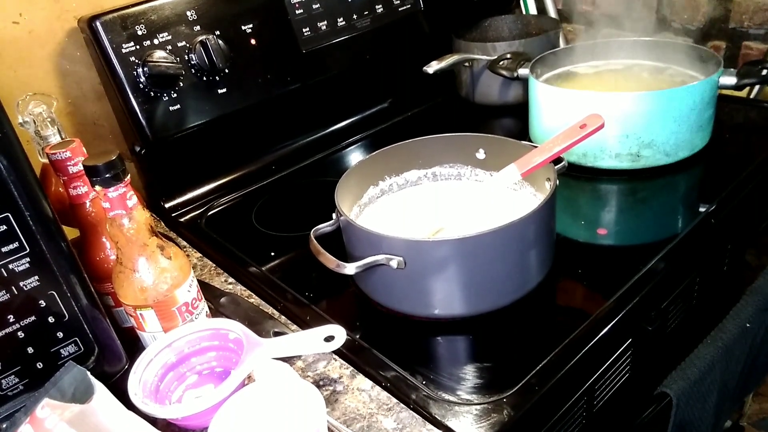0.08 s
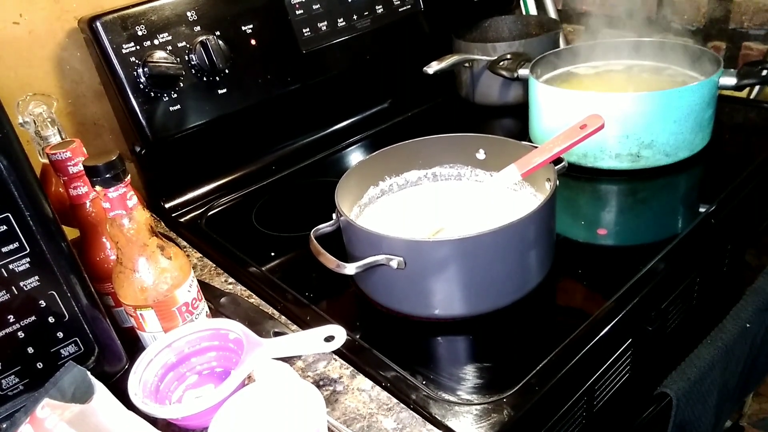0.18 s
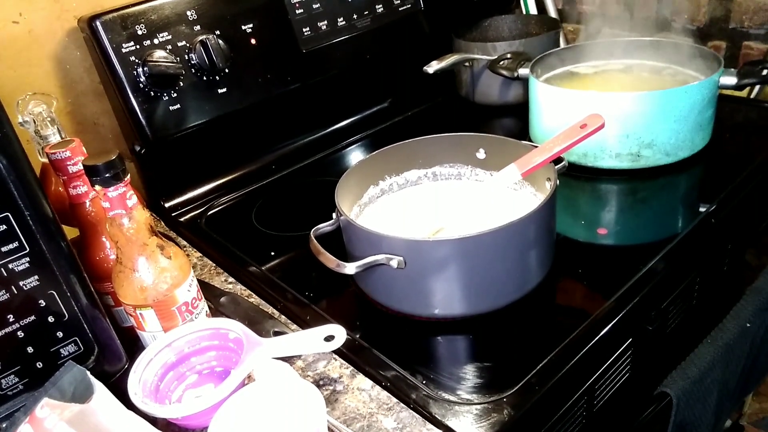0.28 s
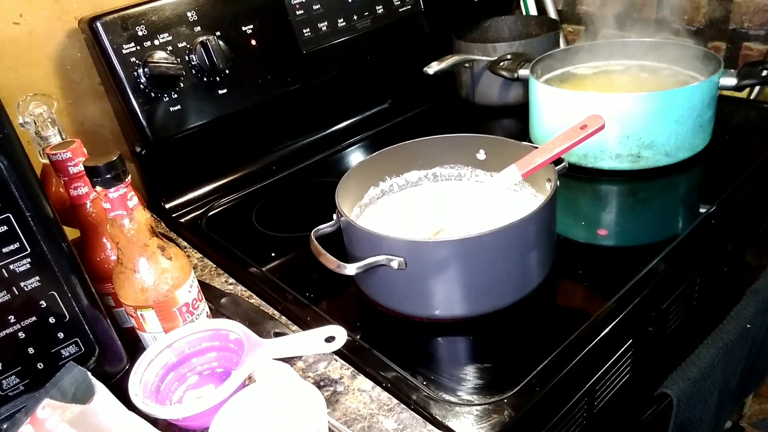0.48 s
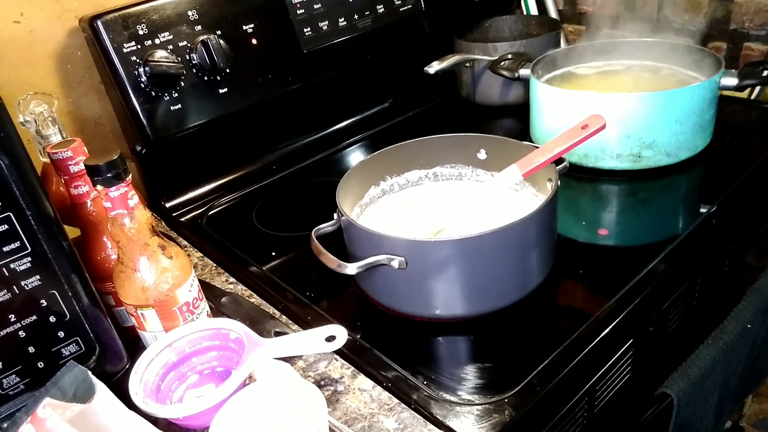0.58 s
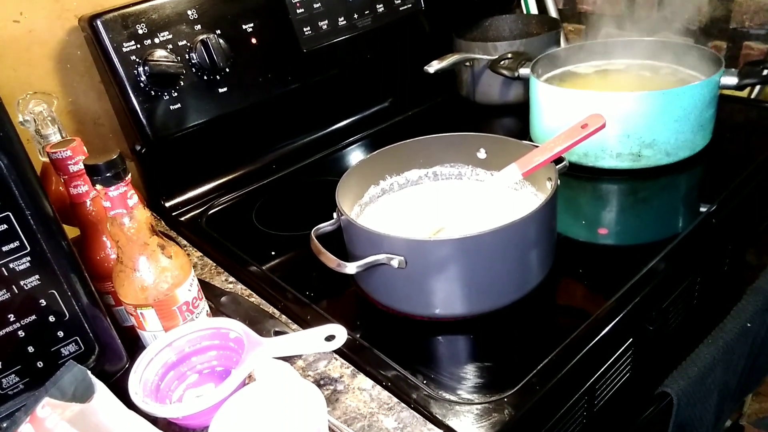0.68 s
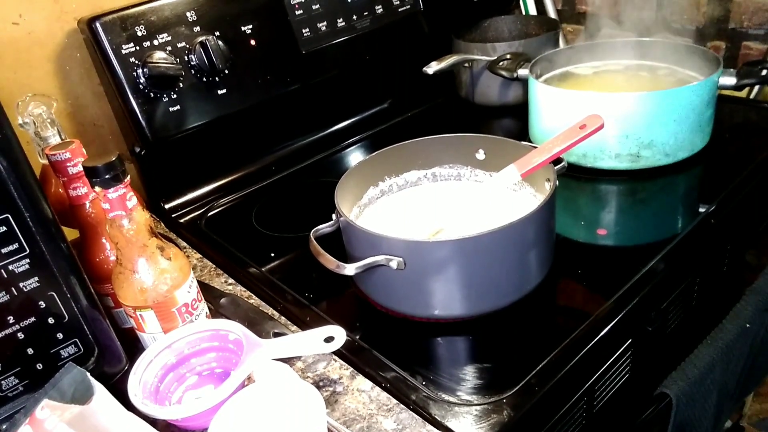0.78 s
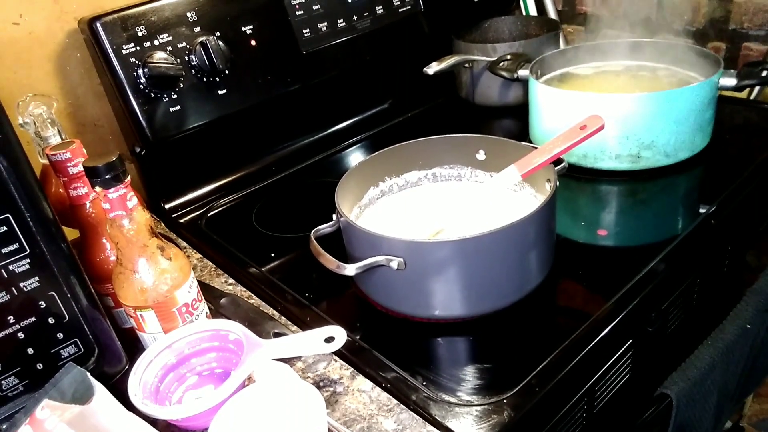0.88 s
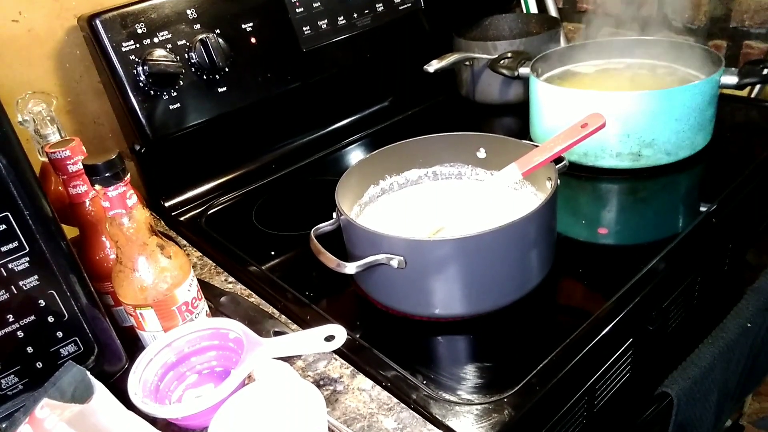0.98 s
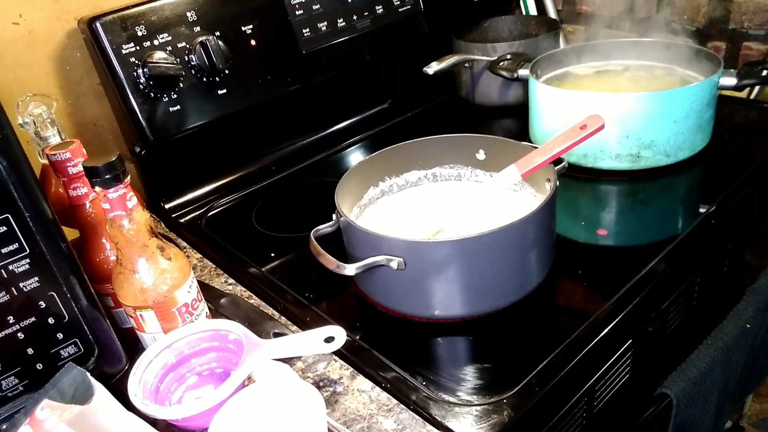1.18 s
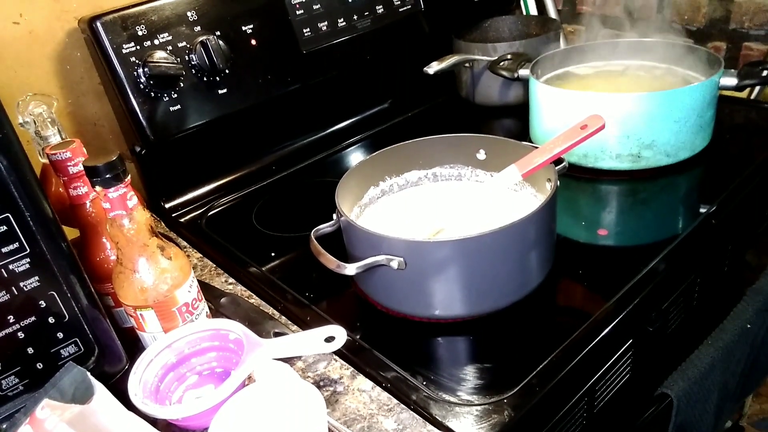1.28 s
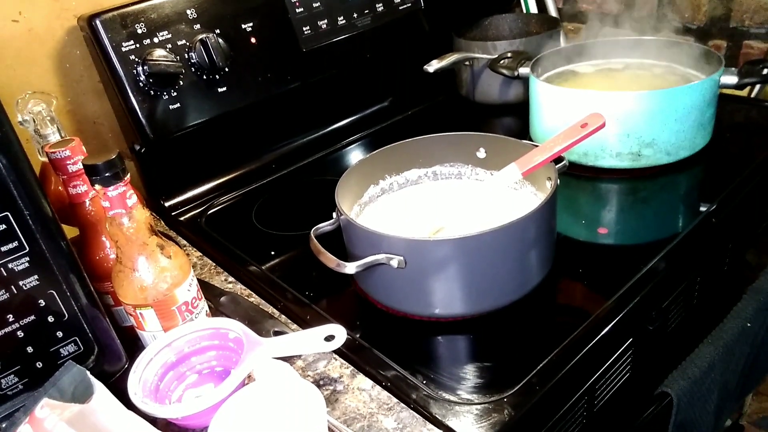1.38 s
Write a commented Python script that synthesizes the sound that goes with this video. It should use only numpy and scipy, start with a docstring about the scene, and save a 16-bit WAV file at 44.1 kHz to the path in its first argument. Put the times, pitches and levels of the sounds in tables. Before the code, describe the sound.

A utensil clatters onto a kitchen counter. After quiet room noise, a faint hollow touch at 0.2 seconds leads into a loud burst of sharp clacks and boomy thuds at 0.24-0.3. Lighter bounces follow around 0.4-0.5 and 0.61, then soft low knocks. A quick, quiet rattle runs 0.86-0.92. Tiny metal tinks come at 1.16 and 1.32, one faint thud at 1.38. Close, dry, short room reflections.

```python
"""Room noise, faint appliance hums and grainy rustles of shaped noise lie under a close, dry kitchen scene.
A utensil lands on the counter: its handle knocks hollowly, then decaying modes boom as the cabinet thuds.
Hard edge ticks, short swelling sines with a noise crack, mark the bounces; a quickening rattle follows.
Tiny metal tinks and one last faint thud come near the end; dense decaying noise answers as the kitchen."""
import sys
import numpy as np
from scipy import signal
from scipy.fft import rfft, irfft
from scipy.io import wavfile
from scipy.ndimage import uniform_filter1d

SR = 44100
rng = np.random.default_rng(int(sys.argv[2]) if len(sys.argv) > 2 else 0)


def boost(x):
    """Linear amplitude factor 10**(x/20) for a level x in decibels (scalar or array-like)."""
    u = np.asarray(x, float) / 20
    return 10 ** u


def int16_out(signal):
    """Quantize to a 16-bit WAV file."""
    q = np.round(np.clip(np.atleast_2d(signal).T, -1, 1) * 32767)
    wavfile.write(sys.argv[1], SR, q.astype(np.int16))


N = 61740

# steady appliance tones: f/Hz, level/dB, width/Hz
HUM_TONES = [(135.5, -71, 20), (1620, -84.5, 13)]
# room noise colour before levelling: f/Hz, density/dB per Hz
AIR_COLOUR = [(20, -46.5), (45, -13), (70, -11), (116, -13), (250, -13), (388, -16), (527, -9.5),
              (650, -16.5), (950, -19.5), (1300, -28), (2300, -30), (6000, -34), (9500, -29),
              (12000, -33.5), (16000, -37)]
# left-right likeness of the room noise: f/Hz, likeness (0 to 1)
AIR_LIKENESS = [(50, 0.74), (300, 0.18), (800, 0.46), (2000, 0.6), (16000, 0.049)]
# faint rustles: start t/s, length/s, level/dB before grain and colour
RUSTLE_SWELLS = [(.0, 0.059, -68.5), (0.124, 0.044, -67.5), (0.64, 0.17, -61.5), (0.782, 0.084, -74),
                 (0.817, 0.032, -64), (1.001, 0.014, -74.5), (1.154, 0.1, -70.5), (1.237, 0.028, -66.5),
                 (1.26, 0.25, -68)]
# rustle colour before levelling: f/Hz, density/dB per Hz
RUSTLE_COLOUR = [(1200, -9.5), (2500, -10), (4000, -10.5), (7000, -12), (10000, -9), (12000, -14),
                 (16000, -24.5)]
# decay of the kitchen's reflections: f/Hz, t60/s
KITCHEN_DECAY = [(100, 0.6), (500, 0.11), (2000, 0.28), (6000, 0.16), (12000, 0.26)]
# colour of the blows at the microphones, direct and reflected: f/Hz, level/dB
MIC_COLOUR = [(20, -17.5), (45, 1.5), (1200, 1.5), (2500, 4.5), (5000, 0.5), (9000, 2), (11000, -2.5),
              (13000, -11.5), (16000, -14)]
# tiny metal tinks: t/s, level/dB
TINK_HITS = [(1.161, -57), (1.166, -57), (1.172, -68.5), (1.321, -52), (1.325, -52.5), (1.331, -57.5),
             (1.336, -63.5), (1.354, -57.5)]
# modes of a tink, before random spread: f/Hz, level/dB, t60/s
TINK_MODES = [(4480, -16, 0.029), (5210, -11.5, 0.024), (6200, -12.5, 0.028), (8050, -6.5, 0.052),
              (8780, -4.5, 0.025), (9270, -4.5, 0.027), (10400, -7, 0.023), (12600, -10.5, .015)]
# modes of the hollow handle, before random spread: f/Hz, level/dB, t60/s
HANDLE_MODES = [(224, -3.5, 0.099), (398, -10, 0.16), (559, 2, 0.17), (792, -2, 0.87), (1048, -12, 0.19),
                (1010, -12, 0.068)]
# blows into the counter: t/s, level/dB, lowest f/Hz stirred, contact roll-off f/Hz, multiple of usual ringing time
THUD_BLOWS = [(0.2021, -36, 435, 1080, 1.7), (0.2371, -16.5, 212, 1620, 1.59),
              (0.2442, -14, 170, 970, 0.93), (0.248, -21, 29.7, 198, 1.24), (.255, -16, 150, 900, 1.38),
              (.262, -23.5, 129.5, 600, 1.94), (0.291, -18, 117, 750, 0.73),
              (0.321, -18, 81.6, 613.4, 0.38), (0.353, -31.5, 80.8, 620, 1.1),
              (0.4053, -34, 307, 1902, 0.62), (0.4621, -25.5, 65, 1498, 0.77), (.469, -29.5, 80, 725, 1.7),
              (.480, -27, 199, 904, 1), (0.497, -35.5, 300, 1446, 0.78), (.606, -30, 200, 1946, 0.38),
              (0.6112, -26.5, 69.3, 447, 0.7), (.628, -34, 250, 912, 0.79), (.652, -39.5, 300, 675, 1.6),
              (0.669, -32, 71, 220, 0.51), (0.705, -32.5, 70.4, 218.7, 0.7), (.708, -47, 450, 896, .7),
              (0.747, -42, 82.7, 250, .9), (.785, -32.5, 70, 223.8, 0.73), (.784, -47, 400, 1198, 1.28),
              (0.841, -36.5, 80, 250, 0.76), (.874, -42, 90, 297.8, 0.68), (0.887, -35, 329, 456, 0.72),
              (0.94, -46, 250, 563.5, 0.42), (1.384, -51, 1190, 2160, 0.63)]
# modes of counter and cabinet, before each blow's spread and ringing multiple: f/Hz, level/dB, usual t60/s
COUNTER_MODES = [(54.5, -9, 0.18), (90, -15.5, 0.41), (104.1, -9, .18), (139.3, -15.5, 0.3),
                 (171.4, -15.5, .12), (206, -11.5, 0.14), (246.5, -18.5, 0.21), (283.9, -12, 0.076),
                 (356, -17.5, 0.18), (386.7, -19, 0.25), (396, -23.5, 0.057), (488.6, -21.5, 0.28),
                 (559.3, -15, 0.18), (681.5, -23.5, 0.31), (776, -21, 0.098), (852, -24.5, 0.13),
                 (919, -21.5, 0.27), (983, -21, 0.065)]
# hard edge ticks: t/s, level/dB, centre f/Hz, width/Hz, left over right/dB
EDGE_TICKS = [(.201, -50, 4960, 4000, 0), (0.242, -19.5, 3940, 3950, 8.5), (0.2448, -5.5, 6200, 2300, 2),
              (.2478, -16.5, 5860, 3000, -4), (0.249, -10.5, 7040, 4040, -3), (0.253, -10, 5960, 2495, 7.5),
              (0.2557, -9, 5340, 2480, 3), (0.2585, -1, 6050, 2630, -7), (0.2592, -15, 8700, 3960, 3),
              (0.2604, -12.5, 5960, 2433, 7), (0.263, -17.5, 5790, 2930, -6),
              (0.269, -13.5, 6200, 2070, -17.5), (0.279, -17.5, 6400, 1503, 6),
              (.292, -13, 5100, 1992, 1.5), (0.367, -24.5, 6680, 6030, 1.5), (0.4062, -19.5, 8250, 6950, 1),
              (0.469, -17, 5360, 4257, 6.5), (0.4803, -21, 5080, 4583, -2), (0.491, -31.5, 4500, 3990, 0),
              (0.4979, -15.5, 9050, 6960, -0.5), (0.6124, -29.5, 5400, 5000, 2),
              (0.6248, -38.5, 4036, 3008, -8.5)]
# brief modes of the utensil, before each tick's reach and spread: f/Hz, level/dB, t60/s
UTENSIL_MODES = [(3898, -18.5, 0.028), (4833, -21.5, .015), (5130, -20, .015), (5930, -18, 0.009),
                 (5950, -19, 0.015), (6060, -17, 0.006), (6420, -14.5, .015), (7300, -20.5, .01)]

AIR_DB = -67
ROOM_DB, THUD_ROOM_DB = -4, -10  # reflections of ticks and of thuds
FIRST_ECHO_S, ROOM_RISE_S = 0.0027, .004
LEFT_LAG_S, THUD_PAN_DB = 0.0002, -1.5  # the drop is nearer the right microphone; left over right
RISE_CYCLES = 0.083  # time constant of each mode's swell, in its own cycles
SPREAD_DB = 4  # each blow lands elsewhere and stirs the modes differently
TINK_CRACK_DB = 3.5  # dry tick over the level of its tink
TOUCH_S, TOUCH_DB = .2015, -42.5
RATTLE_FROM_S, RATTLE_DB, RATTLE_HZ, KNOCK_DB = .8555, -37, 9030, -38.5
RATE_START, RATE_STEP = 275, 3.5  # rattle ticks per s, and the rise per tick
RATTLE_ARCH_DB, RATTLE_PEAK = 87, .25  # fade per squared share of the rattle; share at which it is loudest
DENSE_DB, DENSE_T60_S = 4.5, .18  # higher panel modes: level before filtering, usual ringing time
DENSE_LOW_HZ, DENSE_TOP_HZ = 250, 4500
REACH_DB = 12.5  # modes one tick width away from its centre are stirred this much less
CLACK_DB, CLACK_T60_S = -3, .0045  # crack of each tick, level before filtering
CLACK_FROM, CLACK_TO = .25, 1.9  # band of the crack, as shares of the tick centre
FULL_SCALE, KNEE, EDGE_HZ = .9, 4, 15800  # input ceiling, sharpness of its rounding, top of the band


def evened(x):
    """Scales to rms 1."""
    return x / np.sqrt(np.mean(x ** 2) + 1e-20)


def read(points, hz):
    """Reads a table on a log-frequency axis."""
    f, value = np.transpose(points)
    return np.interp(np.log(hz + 1), np.log(f + 1), value)


def add(mix, s, sound):
    """Mixes a sound in at a time."""
    part = mix[..., max(round(s * SR), 0):][..., :sound.shape[-1]]
    part += sound[..., :part.shape[-1]]


def band(x, hz, kind):
    """Gentle second-order filter."""
    return signal.sosfilt(signal.butter(2, np.clip(hz, 20, 20000), kind, fs=SR, output="sos"), x)


def sides(pan_db):
    """Left and right gains for a left-over-right level."""
    return boost(np.array([[.5], [-.5]]) * pan_db)


def ring(modes, spread_db, detune, size):
    """Dying sines of a struck object; mode levels and pitches vary from blow to blow."""
    hz, db, t60 = np.transpose(modes)[:, :, None]
    level_draw, pitch_draw = rng.standard_normal(hz.shape), rng.standard_normal(hz.shape)
    t = np.arange(size) / SR
    sign = (-1.) ** ((np.arange(len(hz))[:, None] + 1) // 2)  # polarity turns every second mode
    decay = boost(db + spread_db * level_draw - 60 * t / t60)
    swell = 1 - np.exp(-t * hz / RISE_CYCLES)
    wave = np.sin(2 * np.pi * hz * (1 + detune * pitch_draw) * t)
    return (sign * decay * swell * wave).sum(0)


def hiss(spectrum, same):
    """Stereo noise of a given spectrum, its right side sharing part of the left."""
    hz = np.fft.rfftfreq(N, 1 / SR)
    left, other = rfft(rng.standard_normal((2, N)))
    likeness = np.clip(same(hz), 0, 1)
    right = likeness * left + np.sqrt(1 - likeness ** 2) * other
    return evened(irfft(np.array([left, right]) * boost(read(spectrum, hz)), N))


def hums():
    """Appliance tones: slow complex noise makes each steady pitch waver slightly."""
    t, out = np.arange(N) / SR, 0
    for hz, db, width in HUM_TONES:
        pole = np.exp(-np.pi * width / SR)
        noise = rng.standard_normal(N) + 1j * rng.standard_normal(N)
        slow = signal.lfilter([1], [1, -pole], noise)
        out = out + boost(db) * evened((slow * np.exp(2j * np.pi * hz * t)).real)
    return out


def room_noise():
    """Steady coloured hiss whose left-right likeness varies with frequency."""
    return boost(AIR_DB) * hiss(AIR_COLOUR, lambda hz: read(AIR_LIKENESS, hz))


def rustles():
    """Grainy swells of hiss that rise faster than they fall."""
    t = np.arange(N) / SR
    swells = sum(boost(db) * np.sin(np.pi * np.clip((t - s) / length, 0, 1) ** 0.426)
                 for s, length, db in RUSTLE_SWELLS)
    grain = boost(2.6 * evened(uniform_filter1d(rng.standard_normal(N), 150)))
    return swells * grain * hiss(RUSTLE_COLOUR, lambda hz: 0.056 + 0 * hz)  # nearly unlike sides


def kitchen(x):
    """Dense reflections, each band dying at its own speed."""
    size = SR // 2
    onset = np.clip((np.arange(size) / SR - FIRST_ECHO_S) / ROOM_RISE_S, 0, 1)
    taps = rng.standard_normal((2, size)) * onset
    hz, t, z = signal.stft(taps, SR, nperseg=128)
    decay = boost(-60 * t / read(KITCHEN_DECAY, hz)[:, None])
    tail = signal.istft(z * decay, SR, nperseg=128)[1]
    return signal.fftconvolve(x, tail / np.linalg.norm(tail[0]), axes=1)[:, :N]


def tinks():
    """Tiny metal rings, each started by a dry tick."""
    rings = [(s, boost(db) * ring(TINK_MODES, 2.6, 0.0194, size=5000)[None]) for s, db in TINK_HITS]
    cracks = [(s, tick(db + TINK_CRACK_DB, 8540.0, 3440.0, .2)) for s, db in TINK_HITS]
    return rings + cracks


def handle_touch():
    """The handle touches first: its modes ring as a hollow knock."""
    return boost(TOUCH_DB) * ring(HANDLE_MODES, 1.1, 0.0014, size=12000)


def rattle(count):
    """Quickening chatter as the utensil settles: ticks and small knocks."""
    k = np.arange(count)
    gaps = (k > 0) / (RATE_START + RATE_STEP * k) * (1 + .04 * rng.standard_normal(count))
    times = RATTLE_FROM_S + np.cumsum(gaps)
    fade = -RATTLE_ARCH_DB * (k / count - RATTLE_PEAK) ** 2
    tick_db = RATTLE_DB + 0.84 * rng.standard_normal(count) + fade
    ticks = [(s, tick(db, RATTLE_HZ, 4960.0, -2.5)) for s, db in zip(times, tick_db)]
    knocks = [(s, thud(KNOCK_DB + 0.75 * db, 520.0, 1730.0, 0.14)) for s, db in zip(times, fade)]
    return ticks, knocks


def thud(db, low_hz, soft_hz, ringing):
    """Cabinet and crowded panel modes, dulled by a soft contact, ringing longer or shorter from blow to blow."""
    cabinet = ring(np.array(COUNTER_MODES) * [1, 1, ringing], SPREAD_DB, .015, size=16000)
    t = np.arange(len(cabinet)) / SR
    crowd = band(band(rng.standard_normal(len(t)), DENSE_LOW_HZ, "high"), DENSE_TOP_HZ, "low")
    crowd = crowd * boost(DENSE_DB - 60 * t / (DENSE_T60_S * ringing))
    softened = band(cabinet + crowd, soft_hz, "low")
    return boost(db) * band(softened, low_hz, "high")


def tick(db, hz, width_hz, pan_db):
    """Hard contact: a few cycles swell and die, with a short broad crack and the utensil's brief ring."""
    t = np.arange(1500) / SR
    u = np.pi * width_hz * t
    chirp = np.sin(2 * np.pi * hz * t) * u * np.exp(1 - u)  # envelope peaks at 1
    crack = band(band(rng.standard_normal((2, len(t))), CLACK_FROM * hz, "high"), CLACK_TO * hz, "low")
    crack = crack * boost(CLACK_DB - 60 * t / CLACK_T60_S)
    stirred = [(f, level - REACH_DB * ((f - hz) / width_hz) ** 2, t60) for f, level, t60 in UTENSIL_MODES]
    body = np.array([ring(stirred, SPREAD_DB, 0.013, size=len(t)) for _ in "LR"])
    return (chirp + crack + body) * boost(db) * sides(pan_db)


def scene():
    """All blows, heard direct and through the kitchen, over the room noise."""
    ticks, thuds = rattle(count=18)
    thuds.append((TOUCH_S, handle_touch()))
    thuds += [(row[0], thud(*row[1:])) for row in THUD_BLOWS]
    ticks += [(row[0], tick(*row[1:])) for row in EDGE_TICKS]
    ticks += tinks()
    low, high = np.zeros((2, N)), np.zeros((2, N))
    for mix, events in ((low, thuds), (high, ticks)):
        for s, sound in events:
            add(mix, s, sound)
    direct = high + low * sides(THUD_PAN_DB)
    wet = kitchen(boost(ROOM_DB) * high + boost(THUD_ROOM_DB) * band(low, 200., "high"))
    hz = np.fft.rfftfreq(N, 1 / SR)
    lag = np.exp(-2j * np.pi * hz * np.array([[LEFT_LAG_S], [0]]))  # delays the direct left side
    blows = irfft((rfft(direct) * lag + rfft(wet)) * boost(read(MIC_COLOUR, hz)), N)
    return blows + room_noise() + rustles() + hums()


def roll_off(x):
    """The treble ends steeply here."""
    return signal.sosfilt(signal.butter(12, 16700, fs=SR, output="sos"), x)


def record(dry):
    """Soft input overload rounds off the highest peaks, then a steep filter limits the band."""
    rounded = dry / (1 + abs(dry / FULL_SCALE) ** KNEE) ** (1 / KNEE)
    lowpass = signal.firwin(511, EDGE_HZ, window=("kaiser", 9), fs=SR)
    finished = signal.oaconvolve(rounded, lowpass[None], "same")
    return roll_off(finished)


dry = scene()
out = record(dry)
int16_out(out)
```